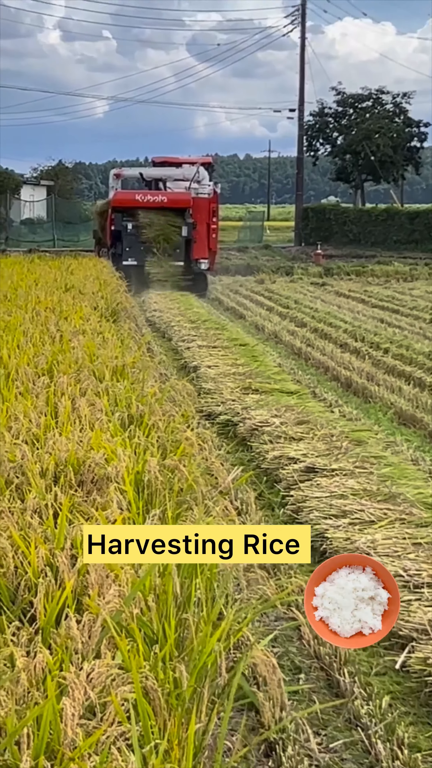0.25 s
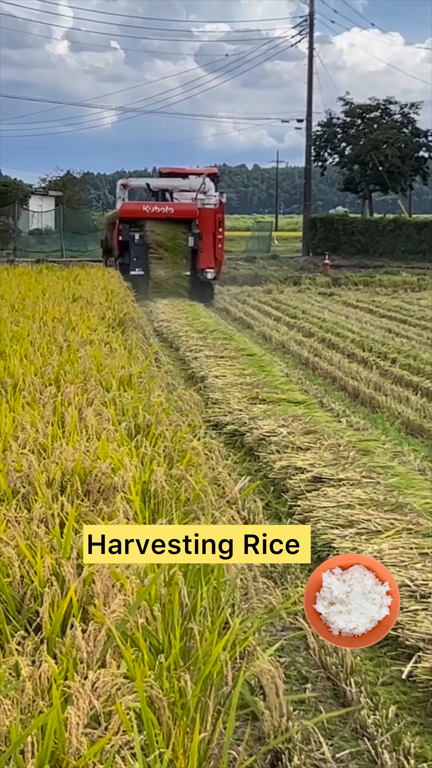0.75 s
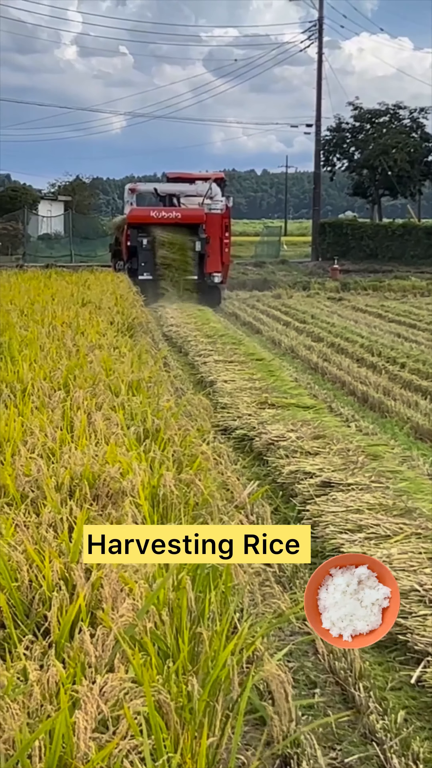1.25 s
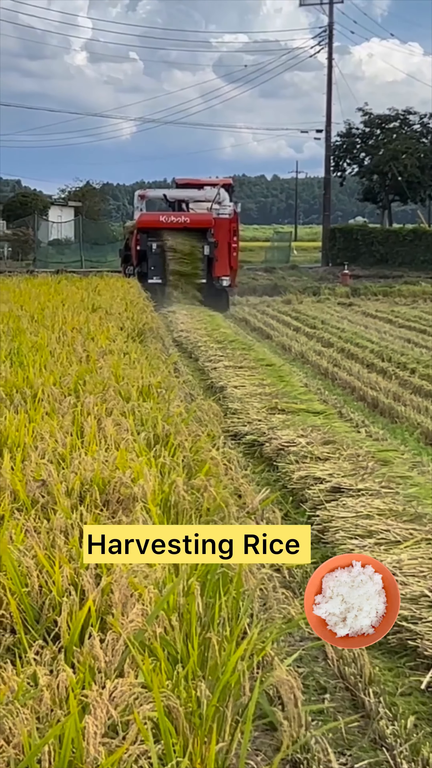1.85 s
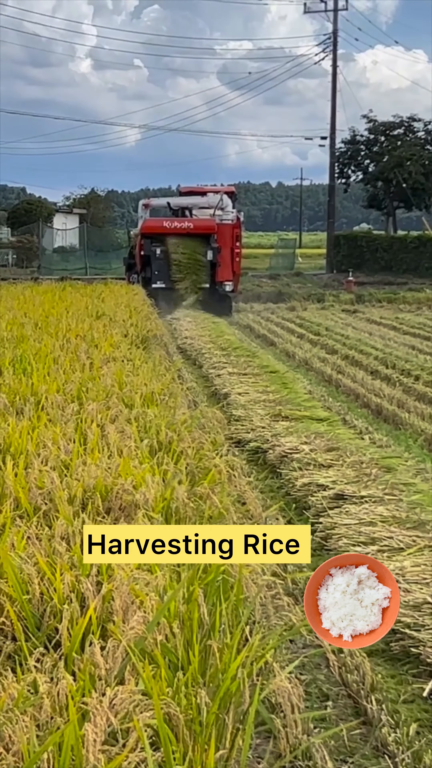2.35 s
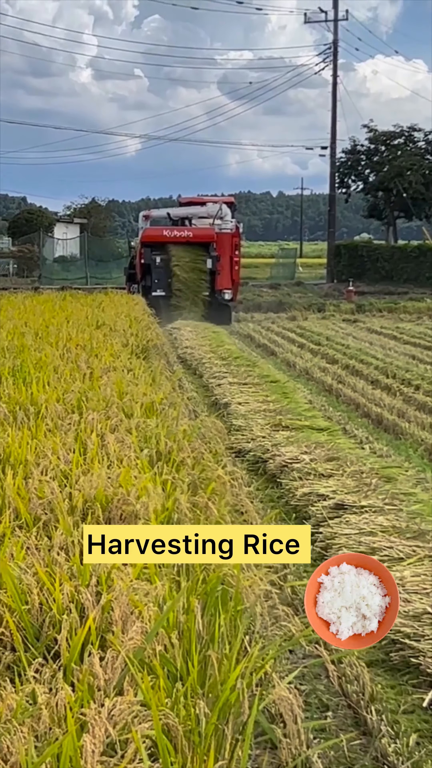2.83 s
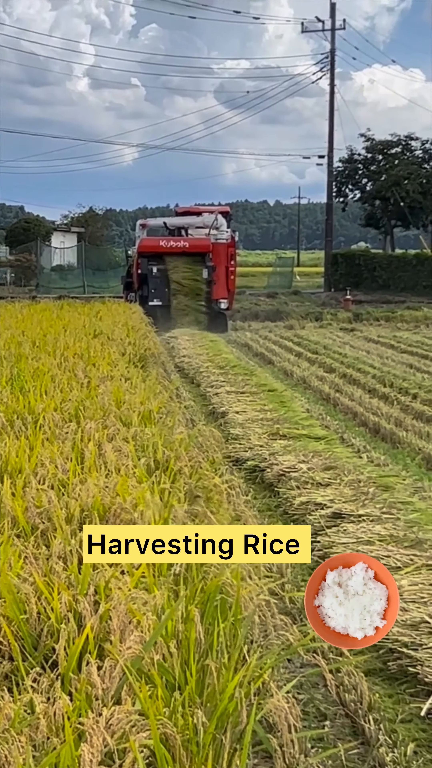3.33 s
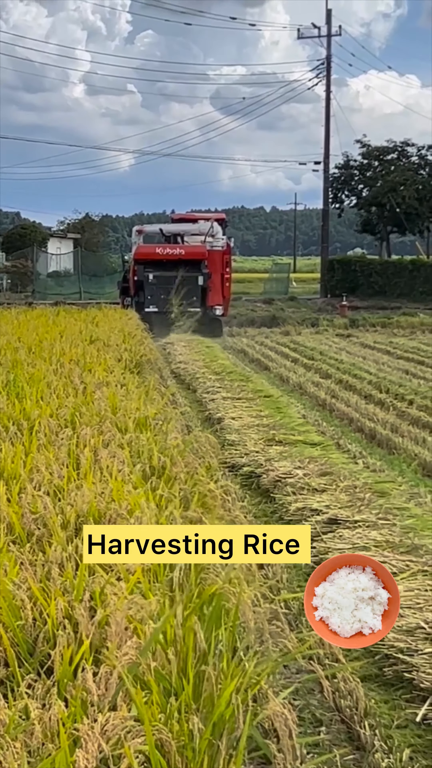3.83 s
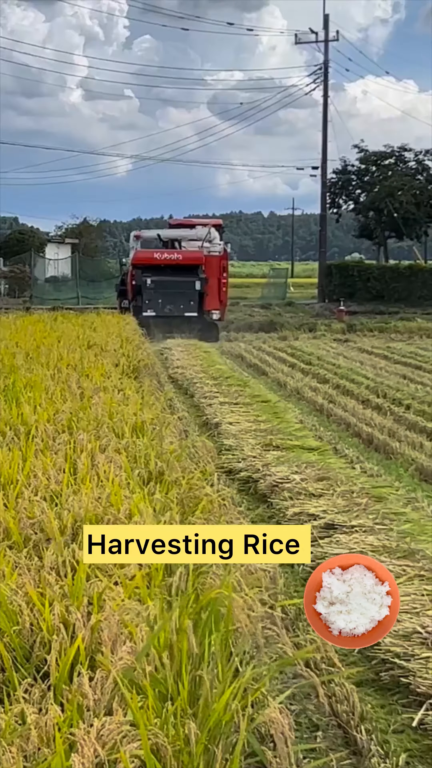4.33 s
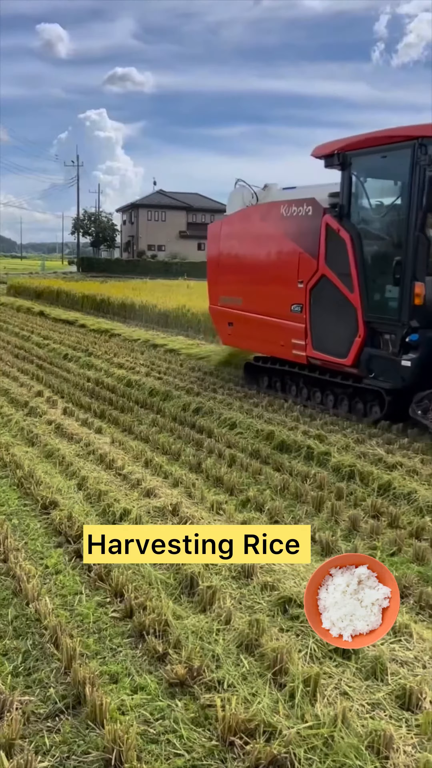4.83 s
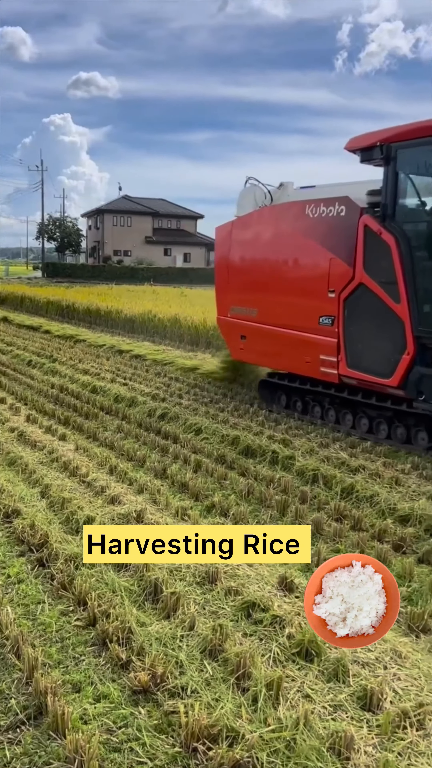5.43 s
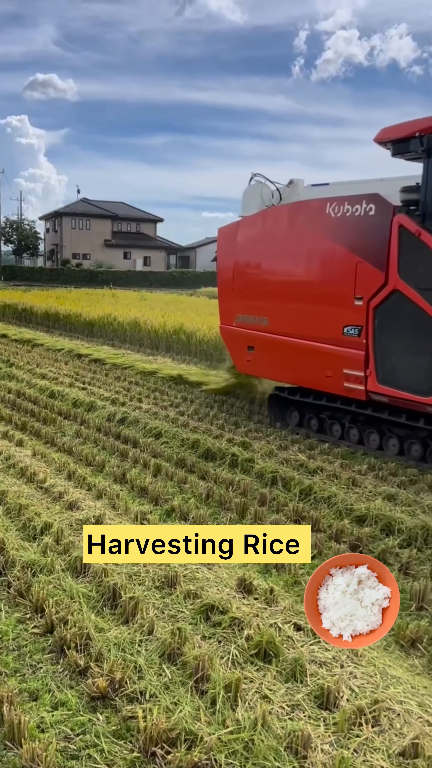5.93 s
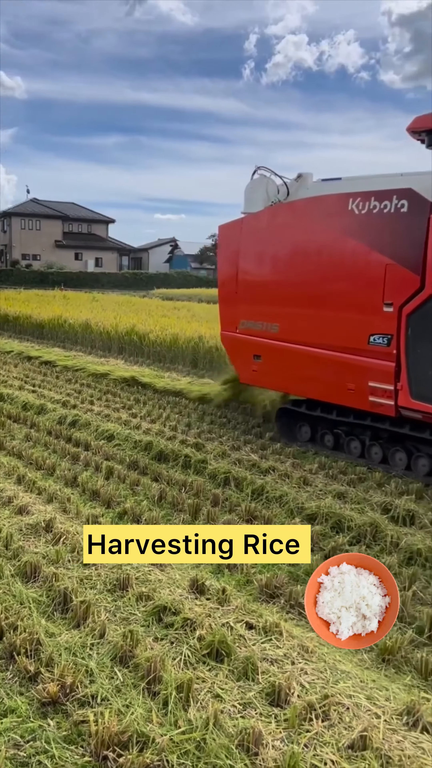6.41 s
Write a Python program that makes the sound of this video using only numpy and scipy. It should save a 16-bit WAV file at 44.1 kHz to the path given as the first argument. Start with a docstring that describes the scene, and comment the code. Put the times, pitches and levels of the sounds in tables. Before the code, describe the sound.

A distant combine harvester hums and rumbles across a rice field, then abruptly roars close by with heavy engine, clatter, thuds and straw hiss.

```python
"""Fan hum and a distant rumble come first, with one insect chirp: a tracked combine harvests rice far off.
Abruptly the same machine is close alongside, its engine tones swelling and its track drive speeding up.
Rotating parts (diesel, fans, shafts, gears, track links) are unsteady sines at their turning rates.
Rumble, thresher clatter and straw hiss are coloured noise, modulated by the machine's rhythms;
wads of crop add damped low thuds. Frequency-dependent phase and likeness spread the noise in stereo."""
import sys
import numpy as np
from scipy import signal
from scipy.fft import rfft, irfft
from scipy.io import wavfile
from scipy.ndimage import uniform_filter1d

SR = 44100
rng = np.random.default_rng(int(sys.argv[2]) if len(sys.argv) > 2 else 0)


def log_audio(samples):
    """Write samples as a 16-bit WAV file to the path given in sys.argv[1]."""
    # one column per channel
    frames = np.atleast_2d(samples).T
    # limit to full scale, then quantise
    limited = np.clip(frames, -1, 1)
    pcm = np.round(limited * 32767).astype(np.int16)
    wavfile.write(sys.argv[1], SR, pcm)


N = 294147
TIME = np.arange(N) / SR  # s
BINS = np.maximum(np.arange(N // 2 + 1) * SR / N, 1)  # Hz, kept above zero for logarithms
CLOSE_FROM_S = 4.4535


def from_db(db):
    """Level definition: decibels to amplitude gain."""
    return np.exp(np.asarray(db) * (np.log(10) / 20))


def rms_one(x):
    """Power normalisation: scale to unit mean square."""
    return x / np.sqrt(np.mean(x ** 2) + 1e-20)


def in_time(rows):
    """Linear interpolation: each column of a time table at every sample."""
    s, *columns = np.transpose(rows)
    return [np.interp(TIME, s, column) for column in columns]


def over_hz(points):
    """Logarithmic pitch scale: a frequency table at every bin."""
    hz, value = np.transpose(points)
    return np.interp(np.log(BINS), np.log(hz), value)


def ramp(start_s, length_s):
    """Linear transition: a steady move from 0 to 1."""
    return np.clip((TIME - start_s) / length_s, 0, 1)


def bell(peak_s, width_s):
    """Gaussian envelope: a smooth swell from 0 to 1 and back."""
    return np.exp(-((TIME - peak_s) / width_s) ** 2)


def drift(rate_hz):
    """Low-pass random fluctuation: smooth chance of unit rms, computed at every 40th sample."""
    pole = np.exp(-80 * np.pi * rate_hz / SR)
    chance = rng.standard_normal(N // 40 + 2002)
    slow = signal.lfilter([1], [1, -2 * pole, pole * pole], chance)[2000:]  # skip the settling
    return np.interp(np.arange(N) / 40, np.arange(len(slow)), rms_one(slow))


def below(hz):
    """Butterworth magnitude: gain of a steep low-pass at every bin."""
    return 1 / np.sqrt(1 + (BINS / hz) ** 16)


def above(hz):
    """Power complement: the high-pass that matches below()."""
    return np.sqrt(1 - below(hz) ** 2)


def turns(per_s):
    """Angle as the integral of speed: revolutions so far, from a chance starting angle."""
    return np.cumsum(per_s * np.ones(N)) / SR + rng.random()


def tone(angle, db, waver_db, jitter):
    """Periodic radiation of a rotating part: load and moving air shake its level and phase [rad]."""
    phase = 2 * np.pi * (angle - np.floor(angle) + rng.random()) + jitter * drift(6.9)
    level_db = db + waver_db * drift(2.1)
    return np.sqrt(2) * from_db(level_db) * np.sin(phase.astype(np.float32))


def impacts(per_s, spread_db):
    """Poisson-like impulses: two independent showers of knocks, with a capped tail of harder ones."""
    hit = rng.random((2, N)) < per_s / SR
    strength = rng.exponential(1, (2, N))[hit]
    sign = np.sign(rng.random((2, N))[hit] - .5)
    out = np.zeros((2, N))
    out[hit] = sign * from_db(spread_db * np.minimum(strength, 4))
    return rms_one(out)


def patchy(noise, patchy_db):
    """Time-frequency modulation: random brief swells in narrow bands make the noise patchy."""
    cells = signal.stft(noise.astype(np.float32), nperseg=256)[2]
    chance = rng.standard_normal(cells.shape[1:]).astype(np.float32)
    over_bands = uniform_filter1d(chance, size=2, axis=0)
    patches = uniform_filter1d(over_bands, size=9, axis=1)
    gain = from_db(patchy_db * rms_one(patches)).astype(np.float32)
    return signal.istft(cells * gain)[1][:, :N]


# Stereo phase: (frequency [Hz], lead of the left channel [rad])
STEREO_PHASE = [(300, -.15), (1000, -.35), (1850, 0), (2240, 1.8), (2500, 2.3), (2760, 2.2), (3010, .2),
                (3620, .2), (4390, .6), (5080, 1.6), (5550, 3.12), (6400, 3.16), (7600, 6.25), (8850, 6.3),
                (9500, 8.3), (9800, 6.4), (11200, 7.4), (11800, 9.3), (12500, 9.5), (13700, 12.55),
                (15100, 12.6), (15700, 14.6)]
# Stereo likeness: (frequency [Hz], share common to left and right [0 to 1])
STEREO_LIKENESS = [(100, .98), (700, .95), (1050, .89), (1700, .99), (3000, .5), (4800, .42), (5300, .65),
                   (5600, .999), (6400, .999), (6700, .5), (7700, .99), (8800, .99), (9100, .5),
                   (11300, .4), (12100, .8), (13000, .35), (13900, .99), (15100, .99), (15500, .3)]


def stereo_response(balance):
    """Interchannel coherence: gains for a share common to left and right, and for one that differs."""
    alike, sides = over_hz(STEREO_LIKENESS), np.array([[1], [-1]])
    turn = np.exp(.5j * sides * over_hz(STEREO_PHASE)) * from_db(sides * over_hz(balance) / 2)
    return np.sqrt(1 + alike) * turn, sides * np.sqrt(1 - alike) * turn


def in_stereo(pair, colour, lean):
    """Superposition: colour two unrelated signals and blend them into left and right, at unit rms."""
    common, apart = rfft(pair.astype(np.float32)) * colour
    blend = lean[0] * common + lean[1] * apart
    return rms_one(irfft(blend.astype(np.complex64), N))


def insect(start_s, hz, width_hz, db):
    """Narrow-band noise: one short, very high rasp in the rice, strongest in its middle."""
    swell = np.interp(TIME - start_s, [0, .008, .028, .033, .046, .051, .085, .095],
                      [0, .3, .3, 1, 1, .25, .2, 0])
    band = np.exp(-((BINS - hz) / width_hz) ** 2)
    rasp = irfft(rfft(rng.standard_normal((2, N))) * band, N)
    return from_db(db) * swell * rms_one(rasp) * from_db([[0], [-4]])  # right 4 dB weaker


# Far cooling fan, sagging once under load and recovering: (time [s], blade rate [Hz])
FAN_SPEED = [(0, 448.5), (.6, 449.3), (.87, 446), (1.3, 451), (1.9, 452.8), (2.5, 450.2), (4.4, 449.6)]
FAN_DB = -50


def fans():
    """Blade-passing tones: the cooling fan, and a slower blower off the same belt."""
    fan_hz = in_time(FAN_SPEED)[0]
    fan = tone(turns(fan_hz), FAN_DB, waver_db=0.1, jitter=0.11)
    blower = tone(turns(fan_hz * 10 / 11), FAN_DB - 6.5, waver_db=1, jitter=.4)
    return fan + blower


# Far belt-driven shafts: (frequency [Hz], level [dB rms])
SHAFTS = [(88.5, -44.5), (100, -52), (154.5, -47.5), (177, -46.5)]


def shafts():
    """Rotational tones: each belt-driven shaft hums at its own unsteady pitch."""
    return sum(tone(turns(hz), db, waver_db=2.0, jitter=0.96) for hz, db in SHAFTS)


# The whine drops out as the load comes on: (time [s], half-width [s], loss [dB])
WHINE_DROP = (0.73, 0.049, 11)
WHINE_DB, WHINE_HOLD_S, WHINE_FADE_S, WHINE_REST_DB = -52.5, 1.47, .55, -62


def far_gear_whine(cycle):
    """Engine-locked whine: the 34th multiple of the cycle holds, then fades to a faint rest."""
    drop_s, drop_width_s, drop_db = WHINE_DROP
    whine_db = WHINE_DB + (WHINE_REST_DB - WHINE_DB) * ramp(WHINE_HOLD_S, WHINE_FADE_S)
    whine_db = whine_db - drop_db * bell(drop_s, drop_width_s)
    return tone(34 * cycle, whine_db, waver_db=1, jitter=.3)


def near_gear_whine():
    """Rotational tone: close by, a gear whines at a fixed mean pitch with a shaken phase."""
    return tone(turns(1324), db=-47, waver_db=3.0, jitter=0.48)


def track_rumble(colour, lean, throb_depth):
    """Amplitude modulation: low noise throbs at a slightly wandering rate."""
    throb = 1 + throb_depth * np.cos(2 * np.pi * turns(37.3 + 2 * drift(3)))
    return in_stereo(rng.standard_normal((2, N)) * throb, colour * below(480), lean)


def thresher_clatter(cycle, colour, lean, knock, grain):
    """Impact noise: small knocks in mid-band noise, stressed at four firings per engine cycle."""
    firing = 1 + knock * np.cos(2 * np.pi * 4 * cycle)
    clatter = rng.standard_normal((2, N)) + grain * impacts(per_s=800, spread_db=2.5)
    band = above(480) * below(2700)
    return in_stereo(patchy(clatter, patchy_db=1.03) * firing, colour * band, lean)


def straw_hiss(straw_colour, lean, chop, grain):
    """Rhythmic modulation: crackling high noise as drum and chopper knives strike the stalks."""
    drum = np.cos(2 * np.pi * turns(42.3))
    knives = np.cos(2 * np.pi * turns(118 + drift(2)))
    crackle = rng.standard_normal((2, N)) + grain * impacts(per_s=3600, spread_db=0.5)
    struck = patchy(crackle, patchy_db=1.5) * (1 + chop * (drum + knives))
    return in_stereo(struck, from_db(over_hz(straw_colour)) * above(2700), lean)


def running_noise(cycle, levels, body, straw_colour, balance, throb_depth, knock, chop, surge_db, grain):
    """Superposed noise sources: the uneven feed of crop swells thresher and straw together."""
    rumble_db, thresher_db, straw_db = levels
    colour, lean = from_db(over_hz(body)), stereo_response(balance)
    rumble = from_db(rumble_db) * track_rumble(colour, lean, throb_depth)
    thresher = from_db(thresher_db) * thresher_clatter(cycle, colour, lean, knock, grain)
    straw = from_db(straw_db) * straw_hiss(straw_colour, lean, chop, grain)
    feed = from_db(surge_db * drift(13.5))
    return rumble + feed * (thresher + straw)


# Rows are rumble, thresher, straw: (starting level [dB], loss by the end of the retreat [dB])
FAR_LEVELS = [(-32.5, 2.5), (-42, 3), (-43.5, 2.5)]
RETREAT_S = 3
# Swells towards the end of the row: (start [s], rise [s], thresher gain [dB], straw gain [dB])
ROW_END_SWELLS = [(2.75, 0.67, 2.5, 4.5), (4.1, 0.32, .3, 3)]


def far_levels():
    """Distance loss: rumble, thresher and straw sink, then the crop noise swells."""
    rumble, thresher, straw = (db - loss_db * ramp(0, RETREAT_S) for db, loss_db in FAR_LEVELS)
    for start_s, rise_s, thresher_db, straw_db in ROW_END_SWELLS:
        thresher = thresher + thresher_db * ramp(start_s, rise_s)
        straw = straw + straw_db * ramp(start_s, rise_s)
    return rumble, thresher, straw


# Far colour of rumble and thresher: (frequency [Hz], relative density [dB])
FAR_BODY = [(20, -83), (30, -78), (41, -60), (56, -54), (85, -54), (120, -54.5), (185, -55.5), (254, -59.5),
            (320, -66.5), (360, -69.5), (440, -68.5), (485, -81.5), (570, -80.5), (680, -77), (822, -75.5),
            (1440, -78), (2740, -78.5)]
# Far colour of straw: (frequency [Hz], relative density [dB])
FAR_STRAW = [(2710, -80), (3410, -79), (3860, -81), (5310, -81), (6410, -85), (7210, -82.5), (8710, -89),
             (9440, -86), (9760, -90), (12510, -89.5), (15690, -94)]
# Far side balance: (frequency [Hz], left minus right [dB])
FAR_BALANCE = [(100, .5), (400, 1.0), (600, -1.3), (1200, -1.7), (1700, 0)]


def far_noise(cycle):
    """Ground absorption: soft ground swallows the band around 500 Hz of the running noise."""
    return running_noise(cycle, far_levels(), FAR_BODY, FAR_STRAW, FAR_BALANCE,
                         throb_depth=.2, knock=.03, chop=.025, surge_db=0.4, grain=0.38)


# Rows are rumble, thresher, straw as the machine goes by: (starting level [dB], loss [dB/s])
NEAR_LEVELS = [(-20.5, 0.53), (-20, 0.6), (-26.5, 1.33)]
# Harder rumble as the machine draws level: (peak time [s], half-width [s], gain [dB])
RUMBLE_SURGE = (4.73, 0.3, 1.5)
# Harder clatters in the thresher: (time [s], gain above the running level [dB])
CLATTERS = [(4.493, 1.5), (4.652, 1.5), (4.736, 0.5), (4.967, 1.5), (5.302, 2.5), (5.471, 2.5), (5.863, 1)]
CLATTER_WIDTH_S = 0.0087


def near_levels():
    """Passing-source levels: all three ease steadily; the rumble surges and the thresher clatters."""
    rumble, thresher, straw = (db - loss_db * (TIME - CLOSE_FROM_S) for db, loss_db in NEAR_LEVELS)
    peak_s, width_s, surge_db = RUMBLE_SURGE
    clatter_db = sum(db * bell(s, CLATTER_WIDTH_S) for s, db in CLATTERS)
    return rumble + surge_db * bell(peak_s, width_s), thresher + clatter_db, straw


# Close colour of rumble and thresher: (frequency [Hz], relative density [dB])
NEAR_BODY = [(27, -68.5), (41, -55), (59, -43), (100, -43), (135, -44), (170, -44), (232, -44.5),
             (332, -48.5), (432, -48), (605, -50), (805, -49.5), (945, -56), (1260, -54.5), (1890, -58.5),
             (2290, -57.5), (2810, -62.5)]
# Close colour of straw: (frequency [Hz], relative density [dB])
NEAR_STRAW = [(2710, -65.5), (3010, -64), (4610, -67), (5310, -63.5), (7010, -68.5), (8710, -70),
              (9440, -69.5), (9760, -73.5), (12510, -73.5), (15690, -76)]
# Close side balance: (frequency [Hz], left minus right [dB])
NEAR_BALANCE = [(100, 0), (380, 1.0), (700, 3.2), (1500, .5), (2500, 1.2), (3300, -2.8), (4700, -4.2),
                (5400, 0)]


def near_noise(cycle):
    """Spectral shaping: close by, the running noise takes its own colour and side balance."""
    return running_noise(cycle, near_levels(), NEAR_BODY, NEAR_STRAW, NEAR_BALANCE,
                         throb_depth=0.17, knock=0.032, chop=0.034, surge_db=0.6, grain=0.5)


# Wads of crop in the threshing drum: (start [s], envelope peak [dB], pitch [Hz])
THUDS = [(0.02, -23.5, 106), (0.067, -22, 87.4), (.25, -26, 86), (.573, -29, 107), (.628, -27, 82),
         (1.096, -24, 87), (1.287, -21, 150), (1.532, -27, 91), (1.826, -26, 148), (2.202, -25, 138),
         (2.387, -30, 123), (2.946, -32, 87), (4.274, -26, 145), (4.59, -13.5, 98), (4.67, -13, 70),
         (4.83, -12.5, 94), (4.946, -12.5, 110), (5.0, -17, 62), (5.083, -13, 114), (5.171, -16, 187),
         (5.356, -11, 152), (5.52, -13, 205), (5.659, -10.5, 106), (5.94, -14, 108), (6.308, -13.5, 120),
         (6.549, -16.5, 101)]
THUD_RISE_S = 0.0068


def thuds():
    """Damped oscillation: each wad gives the drum housing a low throb that dies in a few cycles."""
    out, age = np.zeros(N + SR), np.arange(SR // 5) / SR
    swell = age / THUD_RISE_S * np.exp(1 - age / THUD_RISE_S)
    for s, db, hz in THUDS:
        start = max(int(s * SR), 0)
        out[start:start + len(age)] += from_db(db) * swell * np.sin(2 * np.pi * hz * age)
    return out[:N]


def tracks(link_hz, link_db):
    """Link-passing tone: the track hum rises and falls with the speed over the ground."""
    return tone(turns(link_hz), link_db, waver_db=1.5, jitter=0.1)


# Links passing the sprocket far off: (time [s], link rate [Hz], level [dB rms])
FAR_TRACK = [(0, 56, -37.5), (.15, 55, -35), (.25, 74, -34), (.7, 75, -36.5), (.9, 69, -40), (1.5, 63, -34),
             (2.4, 53, -61), (4.4, 61, -45)]


def far_tracks():
    """Speed-following tone: the distant track hum glides between table points."""
    return tracks(*in_time(FAR_TRACK))


SHIFT_AT_S, SHIFT_S = 5.66, 0.457
SLOW_LINKS_HZ, FAST_LINKS_HZ = 60.1, 77.7
SLOW_TRACK_DB, FAST_TRACK_DB = -25.5, -22


def near_tracks():
    """Speed-following tone: the drive shifts once from slow to fast, and its hum grows."""
    shift = ramp(SHIFT_AT_S, SHIFT_S)
    link_hz = SLOW_LINKS_HZ + shift * (FAST_LINKS_HZ - SLOW_LINKS_HZ)
    link_db = SLOW_TRACK_DB + shift * (FAST_TRACK_DB - SLOW_TRACK_DB)
    return tracks(link_hz, link_db)


def diesel(cycle, orders, waver_db, jitter):
    """Engine orders: unequal cylinders sound multiples of the four-stroke cycle, high ones least steady."""
    return sum(tone(round(k) * cycle, db, waver_db, jitter * k) for k, db in orders)


# Far engine tones: (multiple of the cycle rate [1], level [dB rms])
FAR_ORDERS = [(4, -56), (6, -51.5), (8, -50.5), (13, -63), (14, -50), (17, -71), (28, -74), (32, -68)]


def far_diesel(cycle):
    """Harmonic series: the distant engine's tones, nearly steady in level."""
    return diesel(cycle, FAR_ORDERS, waver_db=-0.1, jitter=0.0073)


# Engine tones that swell as the flank goes by: (multiple of the cycle rate [1], peak [s], level [dB rms])
PASSING = [(10, 5.24, -28.5), (14, 6.15, -28.5), (17, 5.6, -26.5), (18, 6, -31.5), (20, 5.4, -29),
           (34, 4.4, -30.5), (34, 6.36, -32)]
PASSING_WIDTH_S, PASSING_DEPTH_DB = 0.83, 9.5


def passing_orders():
    """Passing-source envelope: each tone swells and sinks along a bell; the strongest swell leads."""
    levels = {}
    for k, s, db in PASSING:
        swell_db = db - PASSING_DEPTH_DB * (1 - bell(s, PASSING_WIDTH_S))
        levels[round(k)] = np.maximum(levels.get(round(k), swell_db), swell_db)
    return levels.items()


# Close engine tones: (multiple of the cycle rate [1], level before side balance [dB rms])
NEAR_ORDERS = [(4, -33.5), (6, -36.5), (8, -36), (16, -37.5), (22, -37), (28, -36.5), (39, -42), (85, -48)]


def near_diesel(cycle):
    """Harmonic series: constant mean levels for some engine tones, passing swells for others."""
    steady = diesel(cycle, NEAR_ORDERS, waver_db=2.0, jitter=0.0094)
    return steady + diesel(cycle, passing_orders(), waver_db=1.34, jitter=0.0065)


# Far engine, sagging once under load and recovering: (time [s], four-stroke cycle rate [Hz])
FAR_SPEED = [(0, 22.98), (.6, 23.03), (.76, 22.91), (1.1, 22.92), (1.6, 23.04), (4.4, 23.02)]


def far_off():
    """Tonal prominence: down the field, hums stand out of the rumble."""
    cycle = turns(in_time(FAR_SPEED)[0])
    hums = fans() + shafts() + far_gear_whine(cycle) + far_diesel(cycle)
    chirp = insect(start_s=.187, hz=13180, width_hz=740, db=-41.5)
    return chirp + far_noise(cycle) + far_tracks() + hums


def alongside():
    """Source proximity: engine tones are strong and the track hum climbs as the machine gathers speed."""
    cycle = turns(23.01)  # four-stroke cycles per s, held steady by the governor
    engine_and_gear = near_diesel(cycle) + near_gear_whine()
    return near_noise(cycle) + near_tracks() + engine_and_gear * from_db([[.65], [-.65]])


def scene():
    """Superposition with a 1 ms crossfade: one machine from two places, one after the other."""
    close = ramp(CLOSE_FROM_S, .001)
    return (1 - close) * far_off() + close * alongside() + thuds()


def record(dry):
    """Band limitation: an elliptic low-pass cuts the top steeply above 15800 Hz."""
    return signal.sosfilt(signal.ellip(12, .1, 90, 15800, fs=SR, output="sos"), dry)


dry = scene()
out = record(dry)
log_audio(out)
```